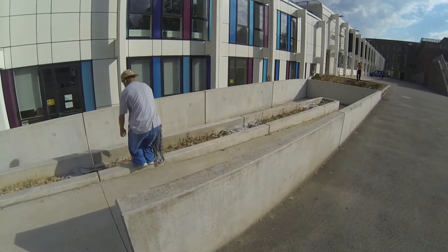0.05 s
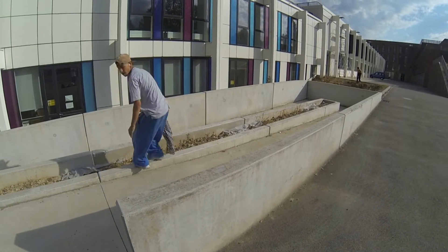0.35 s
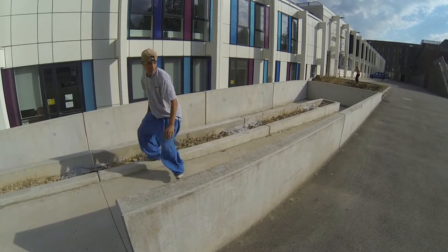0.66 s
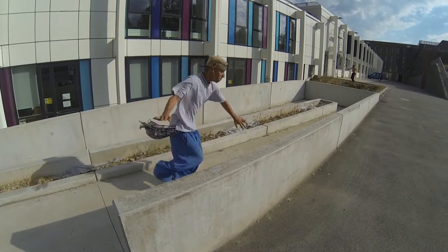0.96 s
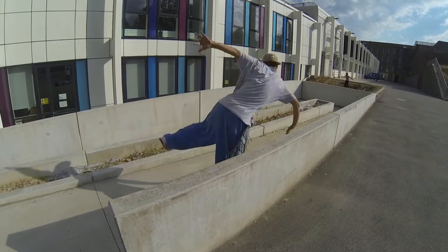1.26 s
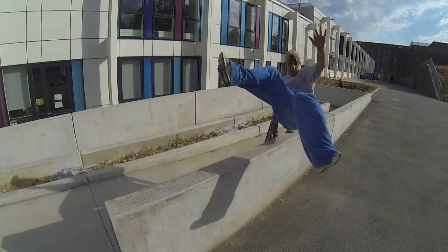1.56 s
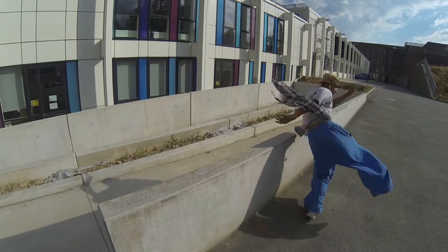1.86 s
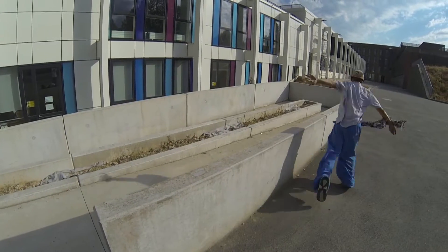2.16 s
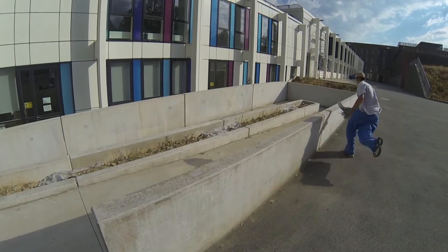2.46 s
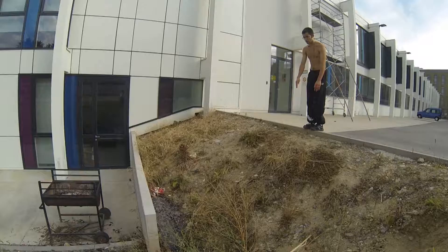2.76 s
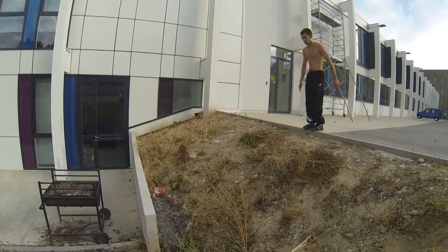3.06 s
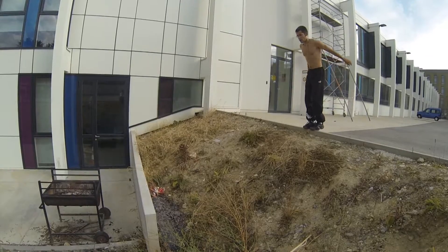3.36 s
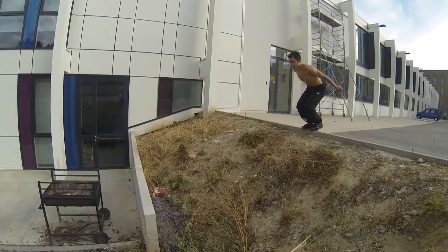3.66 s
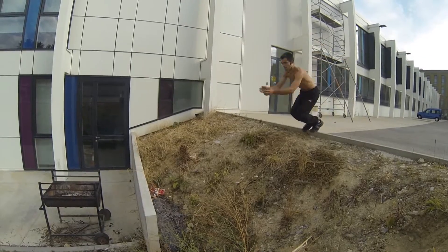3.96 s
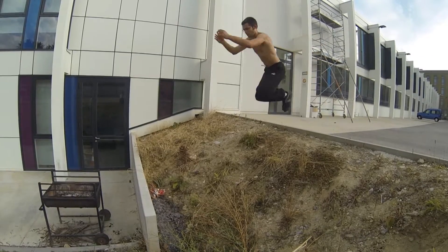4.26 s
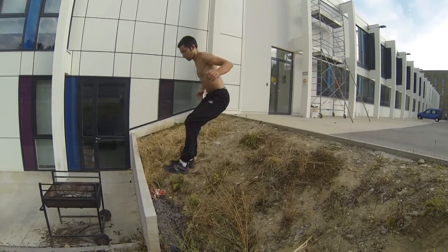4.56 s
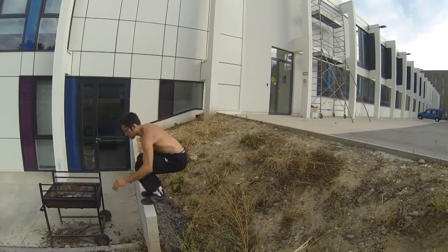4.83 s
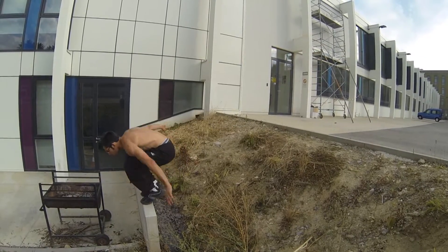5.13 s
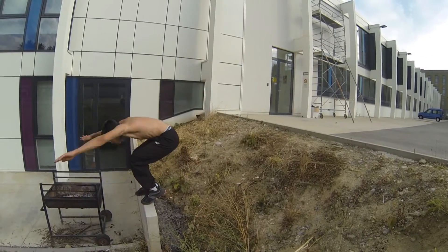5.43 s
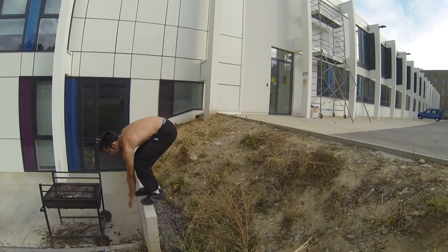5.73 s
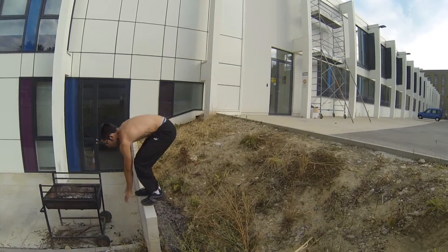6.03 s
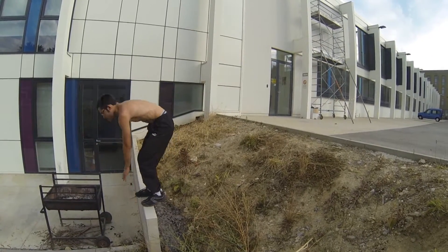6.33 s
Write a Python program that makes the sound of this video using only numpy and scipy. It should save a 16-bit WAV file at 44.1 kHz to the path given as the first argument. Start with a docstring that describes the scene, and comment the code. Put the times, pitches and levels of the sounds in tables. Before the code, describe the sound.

Outdoors beside a building, a runner takes a few soft, gritty steps on concrete and lands a vault with one sharp, loud slap of a sole. Scuffs and footfalls continue over asphalt. After a pause, another jumper thuds onto a wall top with both feet and shuffles faintly. Light wind rumbles and puffs on the microphone throughout, over faint distant traffic and ventilation hum.

```python
"""A parkour runner's soles on concrete, beside a tall building: a vault over a low wall, a flat slap as one
sole claps the air out from under it, then scuffs away over gritty asphalt, trousers brushing.
At a second spot another athlete jumps from a bank, thuds onto a wall top with both feet and pivots.
Light wind rumbles and puffs on the microphone, over distant traffic and the hum of ventilation."""
import sys
import numpy as np
from scipy import signal
from scipy.fft import rfft, irfft, next_fast_len
from scipy.io import wavfile
from scipy.ndimage import map_coordinates

SR = 44100
rng = np.random.default_rng(int(sys.argv[2]) if len(sys.argv) > 2 else 0)


def put_to_file(sound):
    """Save the sound as 16-bit audio at rate SR, in the file named by the first command-line argument."""
    columns = np.atleast_2d(sound).T  # one column per channel
    safe = np.clip(columns, -1, 1)
    whole_steps = np.round(safe * 32767)
    wavfile.write(sys.argv[1], SR, whole_steps.astype(np.int16))


N = 286209
TIME = np.arange(N) / SR
MOVE_S = 2.79  # the microphone is in the yard until here, then at the bank


def amp(db):
    """Decibels to gain."""
    return 10 ** (np.asarray(db) / 20)


def unit(x):
    """Scale to rms 1."""
    return x / np.sqrt(np.mean(x ** 2) + 1e-20)


def along(points, hz):
    """Interpolate (frequency, value) points on a log frequency axis."""
    freqs, values = np.transpose(points)
    return np.interp(np.log(hz + 1), np.log(freqs + 1), values)


def wobble(rate):
    """A smooth random curve, rate knots a second."""
    return map_coordinates(rng.standard_normal(int(N * rate / SR) + 4), [TIME * rate])


def filtered(x, response):
    """x through a frequency response."""
    size = next_fast_len(len(x) + 8192)
    return irfft(rfft(x, size) * response(np.fft.rfftfreq(size, 1 / SR)), size)[:len(x)]


def coloured(x, spectrum, tilt_db=0):
    """x shaped by a spectrum and a tilt per octave, at rms 1."""
    return unit(filtered(x, lambda hz: amp(along(spectrum, hz) + tilt_db * np.log2(hz + 1))))


def resonant(x, modes):
    """x through (frequency, width, level) resonances, at rms 1."""
    def response(f):
        return sum(amp(db) * 1j * f * width / (hz * hz - f * f + 1j * f * width)
                   for hz, width, db in modes)
    return unit(filtered(x, response))


def decay(t, t60):
    """Falls by 60 dB in t60."""
    return np.exp(-np.log(1000) * t / t60)


def add(track, s, sound):
    """Mix a sound in at time s."""
    part = track[max(round(s * SR), 0):][:len(sound)]
    part += sound[:len(part)]


# Wind at the microphone (time [s], strength [dB])
WIND_STRENGTH = [(0, -49), (.65, -54.5), (1.26, -49.5), (1.62, -55), (2.1, -46), (3.25, -53.5), (4.05, -50),
                 (4.64, -50), (4.87, -45), (5.45, -54), (6.49, -48.5)]
# Its rumble on the microphone (frequency [Hz], level [dB])
RUMBLE_SPECTRUM = [(8.8, -52), (15, -4), (54, 0), (109, -17), (150, -16), (166, -21), (341, -26.5),
                   (373, -28.5), (500, -30), (650, -70), (1100, -120)]
# The strongest eddies, right on the microphone (time [s], peak level [dB], half width [s])
WIND_PUFFS = [(1.309, -35, 0.0021), (1.33, -35, 0.0075), (4.006, -34, 0.0042), (4.129, -32.5, 0.004),
              (4.274, -36.5, 0.005), (4.841, -36, 0.0016), (4.9068, -27, 0.00083), (4.9321, -30.5, .0014),
              (4.9699, -38, 0.00112)]


def wind(rumble_db=3.5, eddies_per_s=6, eddy_db=-40, eddy_half_s=0.0037):
    """Lumpy rumble on the microphone; a passing eddy sucks, then pushes, harder in a gust."""
    knots, strength_db = np.transpose(WIND_STRENGTH)
    level_db = np.interp(TIME, knots, strength_db) + rumble_db + 1.9 * wobble(9)
    out = amp(level_db) * coloured(rng.standard_normal(N), RUMBLE_SPECTRUM)
    when, size = rng.random((int(eddies_per_s * N / SR), 2)).T
    times = when * N / SR
    lull_db = np.interp(times, knots, strength_db) - strength_db.max()
    eddies = zip(times, eddy_db + 2.5 * lull_db, eddy_half_s * 2 ** (2 * size - 1))
    for s, db, width in WIND_PUFFS + list(eddies):
        u = (TIME[:SR // 5] - 0.1) / width
        add(out, s - 0.1, amp(db) * u * np.exp((1 - u * u) / 2))
    return out


def hum(tones, drift_hz):
    """Fan tones that waver a little in pitch and level."""
    out = np.zeros(N)
    for hz, db in tones:
        peak = np.sqrt(2) * amp(db + 0.71 * wobble(2.4))
        out += peak * np.sin(2 * np.pi * np.cumsum(hz + drift_hz * wobble(6)) / SR)
    return out


# Distant traffic, heard from the yard and from the bank (frequency [Hz], level [dB])
YARD_TRAFFIC = [(71, -34), (120, -2.5), (136, -7.5), (235, -6.5), (300, -9.5), (375, -19.5), (488, -14.5),
                (719, -14), (936, -12), (1590, -18), (1870, -17), (4300, -41.5), (8950, -50.5),
                (15500, -62)]
BANK_TRAFFIC = [(120, -27.5), (200, -4), (263, -24), (339, -10.5), (414, -19.5), (454, -20), (554, -14.5),
                (607, -14.5), (1130, -13.5), (2090, -21), (2650, -29), (5490, -38), (9310, -49),
                (13600, -53), (15500, -70)]
# Ventilation fans, heard from the same two spots (frequency [Hz], level [dB])
YARD_FANS = [(75.4, -53.5), (953, -77)]
BANK_FANS = [(291, -70.5), (341.5, -66)]


def surroundings():
    """Steady far traffic and ventilation, with their own colour at each spot."""
    yard = amp(-58.5) * coloured(rng.standard_normal(N), YARD_TRAFFIC) + hum(YARD_FANS, drift_hz=0.66)
    bank = amp(-61.5) * coloured(rng.standard_normal(N), BANK_TRAFFIC) + hum(BANK_FANS, drift_hz=0.59)
    moved = np.clip((TIME - MOVE_S) * 20 + 0.5, 0, 1)  # 50 ms crossfade
    return np.sqrt(1 - moved) * yard + np.sqrt(moved) * bank


# The loudest stones cracking underfoot at both spots (time [s], level [dB], pitch [Hz])
LOUD_STONES = [(0.0387, -52, 4860), (0.062, -47, 2800), (0.844, -54, 4500), (1.299, -51, 4400),
               (1.847, -45, 3600), (2.107, -36.5, 3000), (4.6951, -38, 4600)]


def stones(cracks):
    """A stone snaps with a tick whose pitch follows its size."""
    out, t = np.zeros(N), TIME[:SR // 20]
    for s, db, hz in cracks:
        spectrum = [(hz / 4, -24), (hz * 0.93, -3), (hz, 0), (hz * 2, -18), (hz * 4, -32)]
        tick = coloured(rng.standard_normal(len(t)), spectrum)
        add(out, s, amp(db) * tick * decay(t, t60=0.01))
    return out


# Echo off the building beside the athletes (frequency [Hz], t60 [s])
FACADE_DECAY = [(150, 0.15), (2000, .3), (10000, 0.64)]


def facade(x):
    """The building and the low walls scatter a short tail, 5 ms behind the direct sound."""
    hz, t, bands = signal.stft(rng.standard_normal(SR // 2), SR, nperseg=256)
    tail = signal.istft(bands * decay(t, along(FACADE_DECAY, hz)[:, None]), SR, nperseg=256)[1]
    delayed = np.pad(x, (SR // 200, 0))
    return signal.fftconvolve(delayed, tail / np.linalg.norm(tail))[:N]


# Clothing brushing, faint at the microphone: mostly loose trousers, the 4.08 s swell an arm swinging (peak time
# [s], level [dB], half length [s])
CLOTH_SWINGS = [(0.307, -69, 0.21), (0.802, -70.5, 0.11), (1.38, -75.5, 0.41), (1.676, -69.5, 0.056),
                (4.08, -77, 0.079), (5.308, -69, 0.04), (6.03, -77.5, .13)]
# The rubbing cloth (frequency [Hz], level [dB])
CLOTH_SPECTRUM = [(1500, 4.5), (3500, -4.5), (5700, -2), (7400, -15), (9300, -13), (11000, -15),
                  (15000, -22)]


def clothing():
    """Cloth rubs on cloth in soft, high swells as the legs swing, and once as an arm swings."""
    swing = sum(amp(db) * np.exp(-((TIME - s) / length) ** 2) for s, db, length in CLOTH_SWINGS)
    return swing * amp(2.1 * wobble(60)) * coloured(rng.standard_normal(N), CLOTH_SPECTRUM)


# Resonances of soles on the wall top by the bank (frequency [Hz], width [Hz], level [dB])
WALL_TOP_MODES = [(486, 170, -11), (1190, 290, 5), (1730, 340, 6.5), (2530, 77, 8), (4050, 660, -4),
                  (4800, 210, -15), (6100, 220, -33), (8600, 2500, -18)]


def grit(size, s, spectrum, per_s, spread_db, tilt_db=0):
    """Tiny uneven clicks under a sole at time s: broad on the yard floor, hollow on the wall top."""
    clicks = (rng.random(size) < per_s / SR) * rng.choice([-1, 1], size)
    grains = clicks * amp(spread_db * rng.standard_normal(size))
    if s < MOVE_S:
        return coloured(grains, spectrum, tilt_db)
    return resonant(coloured(grains, [(7000, 5), (15000, -12)], tilt_db), WALL_TOP_MODES)


# Grit dragged over the yard floor (frequency [Hz], level [dB])
DRAG_SPECTRUM = [(150, -2), (500, -4), (900, 8), (1500, -3), (2500, 6), (4000, 1), (5400, -0.5),
                 (6300, -9.5), (8500, -10), (11000, -18.5), (15000, -23.5)]


def drag(s, db, rise, fall, tilt_db):
    """Rolling grit swells, then stops as the foot lifts; half a second with the peak in the middle."""
    t = TIME[:SR // 2] - 0.25
    stroke = amp(db - 20 * np.where(t < 0, -t / rise, (t / fall) ** 2))
    return stroke * grit(len(t), s, DRAG_SPECTRUM, per_s=7000, spread_db=4, tilt_db=tilt_db)


# Soles dragging and twisting, across the yard and then on the wall top
# (peak time [s], level [dB], rise [s], fall [s], treble tilt [dB/octave])
SOLE_SCUFFS = [(.43, -61, .05, 0.04, -1.5), (.805, -55, 0.046, 0.066, -4.5), (1.199, -57, 0.022, 0.013, 2),
               (1.34, -68, .12, .089, .5), (1.818, -51, 0.033, .036, 0), (1.924, -55, 0.033, 0.032, 1),
               (2.075, -43, 0.069, 0.067, -0.5), (2.171, -55, 0.047, 0.017, 2),
               (2.351, -40, 0.067, 0.018, .5), (2.53, -64.5, 0.21, 0.24, 1.5),
               (2.63, -47, 0.0097, .006, 1.5), (2.665, -42, 0.037, .023, 4.5),
               (4.794, -57, .045, .035, 2.5), (5.372, -58.5, .031, .024, 2)]


def scuffs(bounce_s=0.00096):
    """A sliding sole grips and slips in a finer spray of grit; the concrete close by combs the sound."""
    out = np.zeros(N)
    for s, db, rise, fall, tilt_db in SOLE_SCUFFS:
        spray = drag(s, db - 16.5, rise * 2.05, fall * 1.14, tilt_db + 7.5)  # softer, longer, brighter
        add(out, s - 0.25, drag(s, db, rise, fall, tilt_db) + spray)
    out *= amp(1.8 * wobble(160))  # grip and slip
    return filtered(
        out, lambda hz: 0.85 + 0.48 * np.exp(-2j * np.pi * hz * bounce_s) / (1 + (hz / 6000) ** 2))


def chips(pitch_hz=4500, log_spread=0.23):
    """Every scuff cracks one small stone near its peak; gives (time, level, pitch) rows for stones()."""
    cracks = []
    for s, db, _, fall, _ in SOLE_SCUFFS:
        when, loud, small = rng.standard_normal(3)
        cracks.append((s + fall * np.tanh(when) / 2, db - 1 + loud, pitch_hz * np.exp(log_spread * small)))
    return cracks


# Grit crushed on the yard floor (frequency [Hz], level [dB])
CRUNCH_SPECTRUM = [(200, -1), (800, 6), (1800, 9.5), (3000, 5), (5300, -1), (6500, -10), (9000, -12.5),
                   (15000, -21)]
# A rubber sole knocking on hard ground (frequency [Hz], level [dB])
KNOCK_SPECTRUM = [(60, -29), (150, 12.5), (300, -5.5), (550, -8), (820, 1), (1400, -8.5), (3000, -56)]


def contact(s, db, t60, knock_db):
    """One touch of a sole: grit crunches and the rubber knocks."""
    t = TIME[:SR // 4]
    crunch = grit(len(t), s, CRUNCH_SPECTRUM, per_s=10000, spread_db=9)
    knock = coloured(rng.standard_normal(len(t)), KNOCK_SPECTRUM)
    return amp(db) * (crunch + amp(knock_db) * knock) * decay(t, t60) * (1 - np.exp(-t / 0.00013))


# Feet crossing the yard, then landing on the wall top
# (time [s], level [dB], t60 [s], knock over crunch [dB], roll time [s], flat contact over touch [dB])
FOOT_CONTACTS = [(0.7905, -52, 0.066, -8, .013, 3), (1.131, -53, .068, 8.5, 0.0032, -2),
                 (1.322, -52.5, 0.074, 0.5, 0.0096, -4), (1.756, -31, 0.022, -23, 0.0052, -5),
                 (1.988, -40, 0.11, 4.5, .022, 3.5), (2.128, -45, 0.032, 2, .006, -2),
                 (2.438, -52, 0.069, 1, 0.0024, 2), (2.711, -47.5, 0.15, -6, .015, 4.5),
                 (4.6905, -36.5, 0.04, -14, 0.0043, 5.5), (4.702, -39, 0.036, 6.5, .0053, 2.5),
                 (4.722, -50, 0.26, 3.5, 0.01, 8)]


def steps():
    """Each foot touches, then rolls flat with a shorter contact that knocks less."""
    out = np.zeros(N)
    for s, db, t60, knock_db, roll, flat_db in FOOT_CONTACTS:
        add(out, s, contact(s, db, t60, knock_db))
        add(out, s + roll, contact(s, db + flat_db, t60=0.02, knock_db=knock_db - 7))
    return out


# Soles coming down flat in the yard (time [s], level [dB], pitch [ratio])
SOLE_SLAPS = [(1.132, -43, .62), (1.754, -23, 1.1), (1.7549, -12, 1), (2.4405, -43, 1), (2.7429, -30, .85)]
# The air pocket between sole and ground (frequency at ratio 1 [Hz], level [dB], t60 [s])
POCKET_MODES = [(1233, -3.5, 0.013), (1970, -7, 0.0081), (3050, -20.5, 0.0046), (5200, -18, 0.0065),
                (7360, -26, 0.0046)]


def slaps():
    """A flat sole claps the air out from under it, and the pocket rings briefly."""
    out, t = np.zeros(N), TIME[:SR // 10]
    for s, db, pitch in SOLE_SLAPS:
        ring = sum(amp(level) * decay(t, t60) * np.sin(2 * np.pi * hz * pitch * t)
                   for hz, level, t60 in POCKET_MODES)
        add(out, s, amp(db) * ring * (1 - np.exp(-t / 0.00008)))
    return out


# Heavy landings in the yard and on the wall top, the 420 Hz row a ring of the wall top (time [s], level [dB],
# frequency [Hz], t60 [s])
LANDING_THUDS = [(1.7558, -26.5, 253, 0.028), (1.763, -29, 116, 0.05), (1.991, -36, 103, 0.069),
                 (2.134, -37, 140, .03), (2.441, -22.5, 158, 0.015), (2.744, -31.5, 183, .04),
                 (4.697, -22.5, 420, 0.037), (4.702, -23, 137, 0.033), (4.7088, -26, 53, 0.13)]


def thuds():
    """Body weight arrives through the sole as a low, damped tone; on the wall top one tone at 420 Hz is the
    wall top itself ringing."""
    out, t = np.zeros(N), TIME[:SR // 4]
    for s, db, hz, t60 in LANDING_THUDS:
        add(out, s, amp(db) * np.sin(2 * np.pi * hz * t) * decay(t, t60) * (1 - np.exp(-t / 0.002)))
    return out


# A sole pivoting on the wall top, faint at the microphone (frequency [Hz], width [Hz], level [dB])
SQUEAK_MODES = [(2740, 130, 0), (4150, 91, -7), (5740, 41, -7)]


def squeak(at_s=5.372, db=-61, half_s=0.014):
    """Twisting rubber chirps briefly in a few narrow resonances."""
    twist = np.exp(-((TIME - at_s) / half_s) ** 2)
    return amp(db) * twist * resonant(rng.standard_normal(N), SQUEAK_MODES)


def scene():
    """The athletes, their weak echo, the wind and the far surroundings at one microphone."""
    athletes = stones(LOUD_STONES + chips()) + clothing() + scuffs()
    athletes += steps() + slaps() + thuds() + squeak()
    return (athletes + amp(-24.5) * facade(athletes) + wind() + surroundings())[None]


def record(dry, top_hz=15500):
    """The camera keeps nothing above its band limit; the sound eases in and out over 4 ms."""
    ease = np.clip(np.minimum(TIME, TIME[-1] - TIME) / 0.004, 0, 1)
    return np.array([filtered(x * ease, lambda hz: hz < top_hz) for x in dry])


dry = scene()
out = record(dry)
put_to_file(out)
```